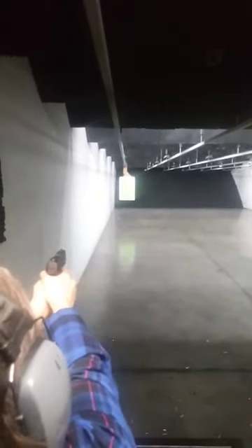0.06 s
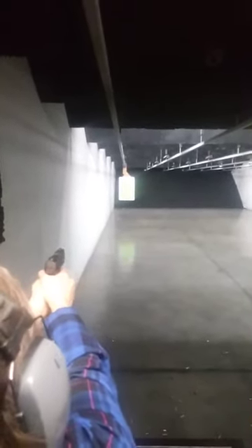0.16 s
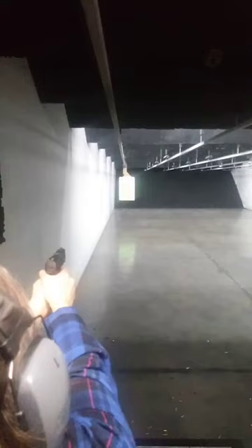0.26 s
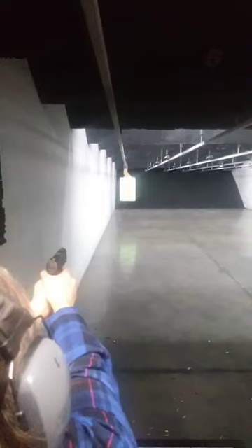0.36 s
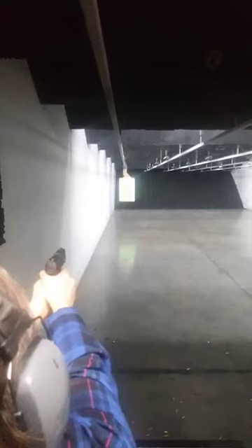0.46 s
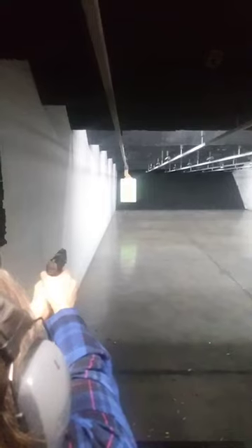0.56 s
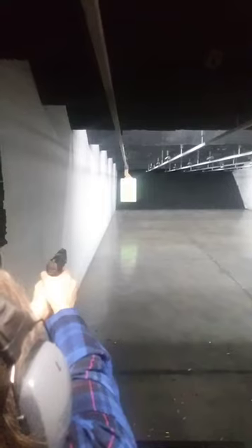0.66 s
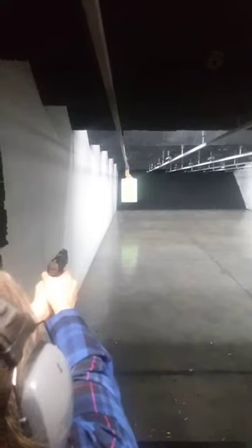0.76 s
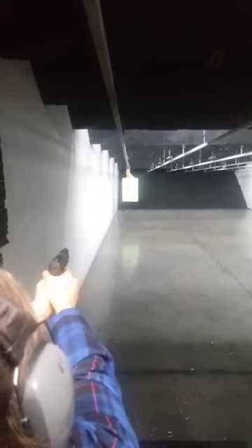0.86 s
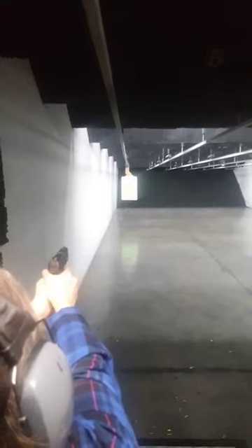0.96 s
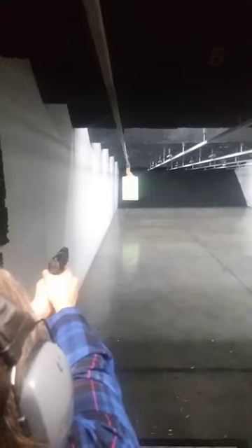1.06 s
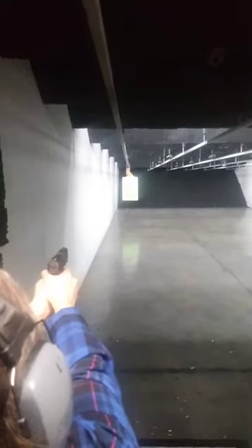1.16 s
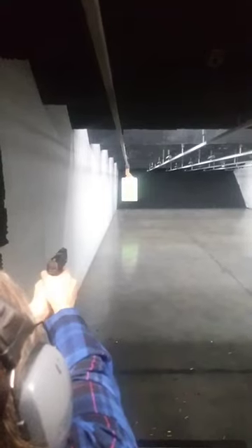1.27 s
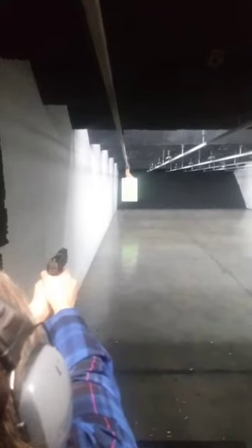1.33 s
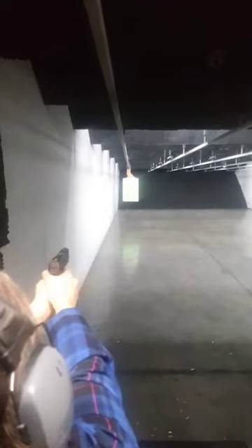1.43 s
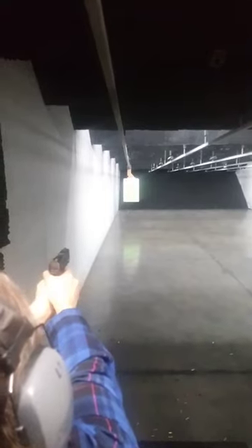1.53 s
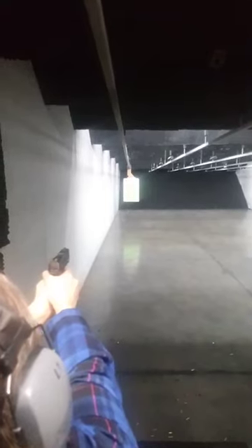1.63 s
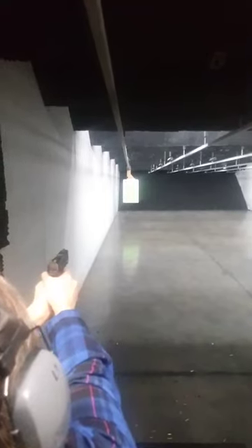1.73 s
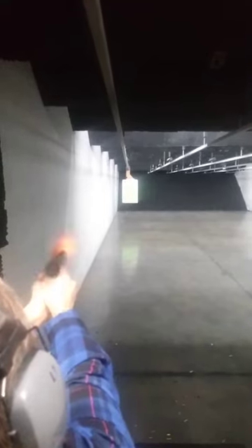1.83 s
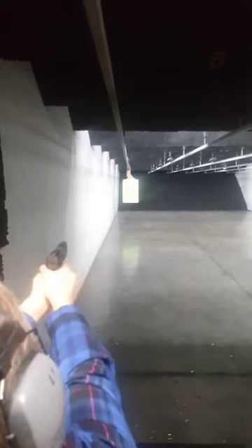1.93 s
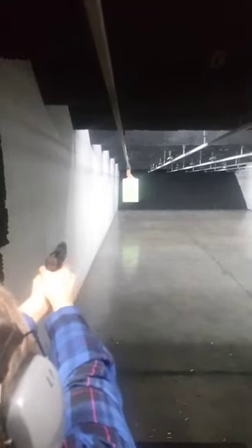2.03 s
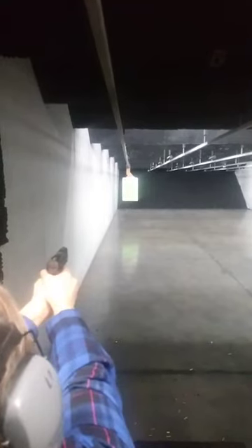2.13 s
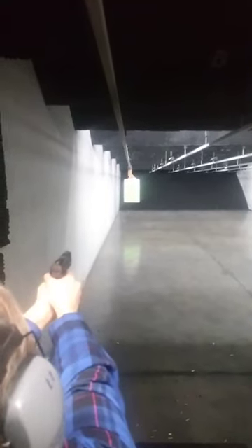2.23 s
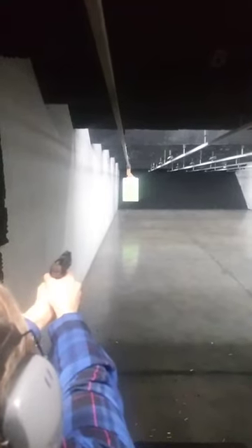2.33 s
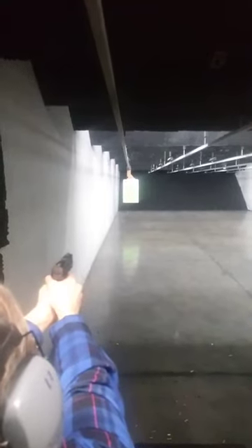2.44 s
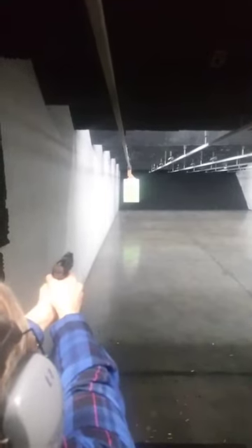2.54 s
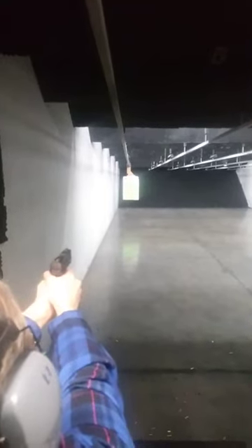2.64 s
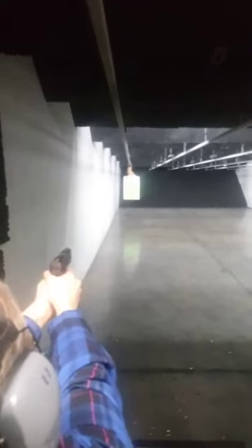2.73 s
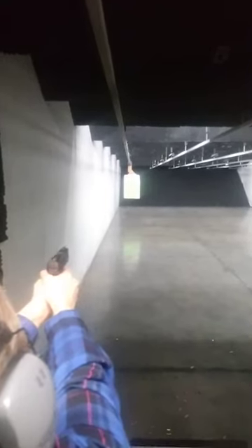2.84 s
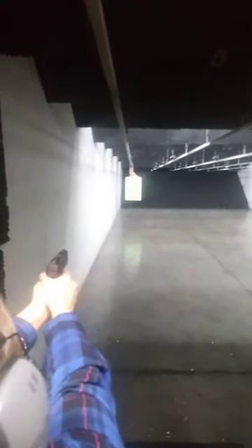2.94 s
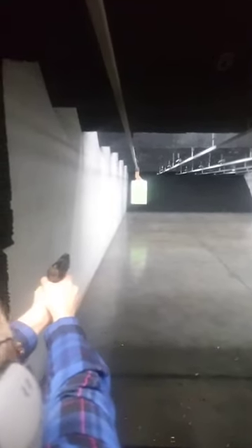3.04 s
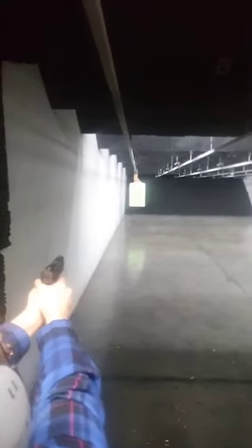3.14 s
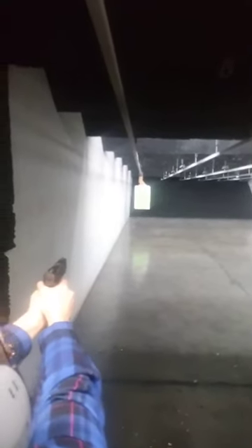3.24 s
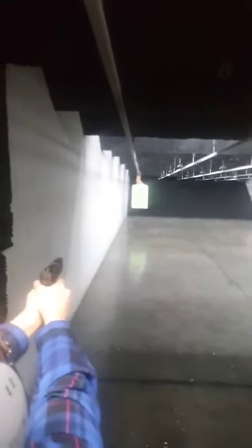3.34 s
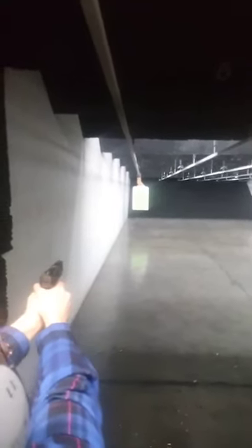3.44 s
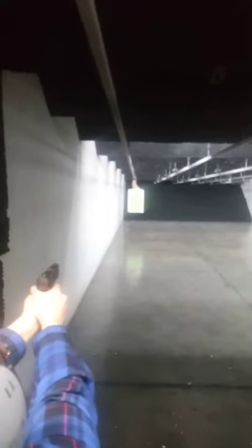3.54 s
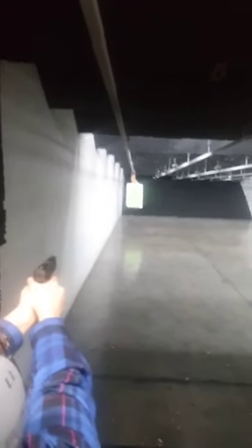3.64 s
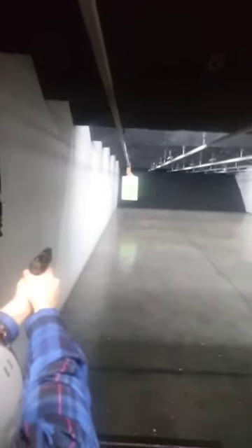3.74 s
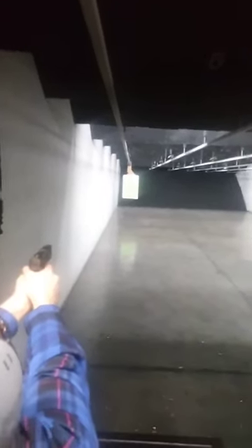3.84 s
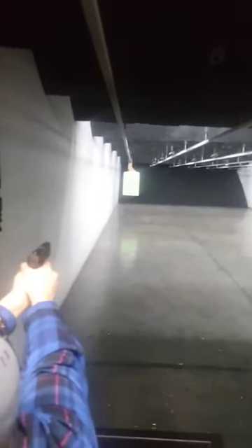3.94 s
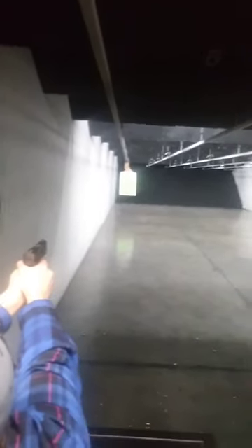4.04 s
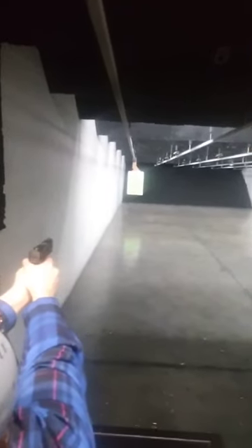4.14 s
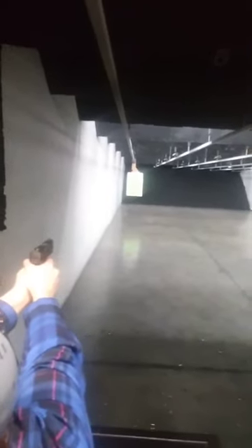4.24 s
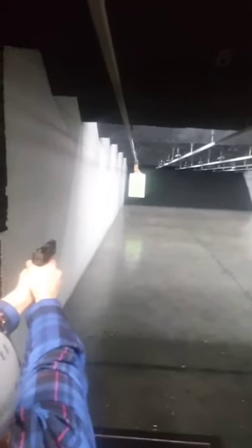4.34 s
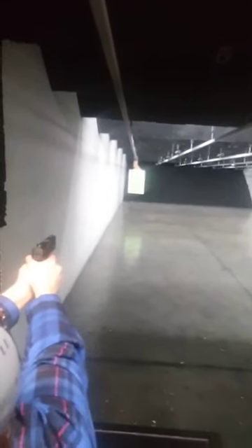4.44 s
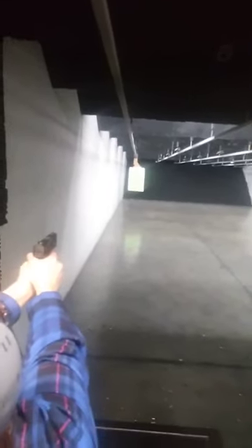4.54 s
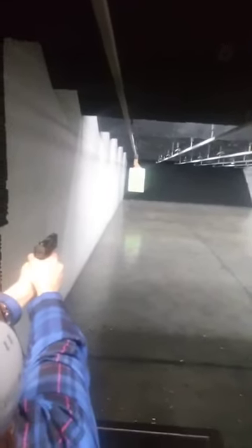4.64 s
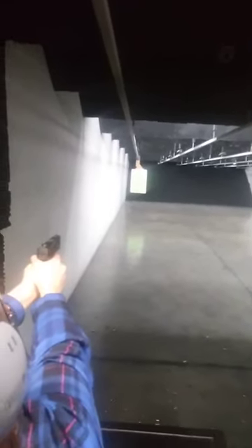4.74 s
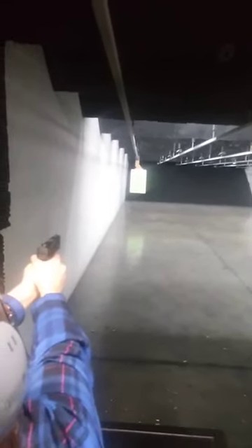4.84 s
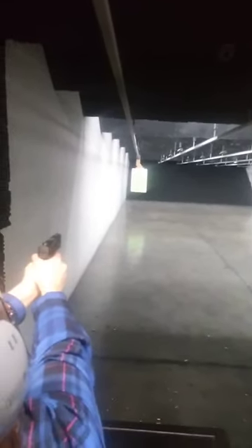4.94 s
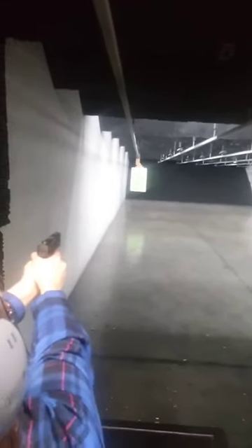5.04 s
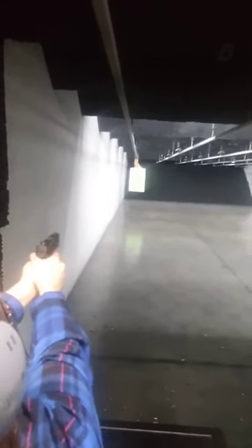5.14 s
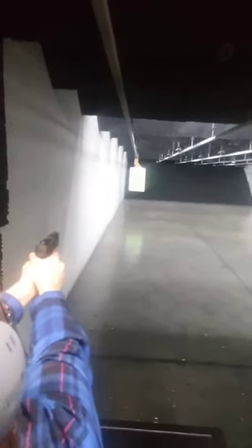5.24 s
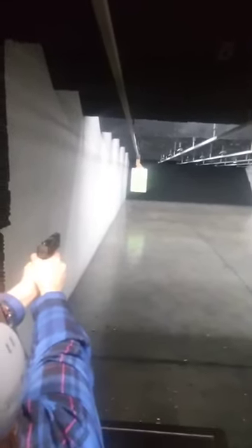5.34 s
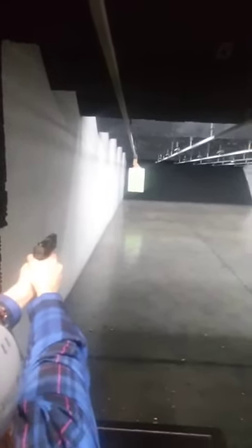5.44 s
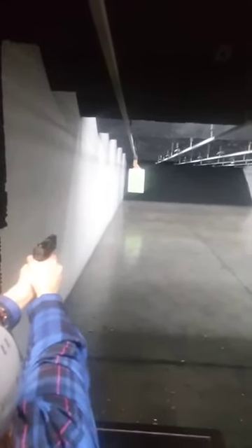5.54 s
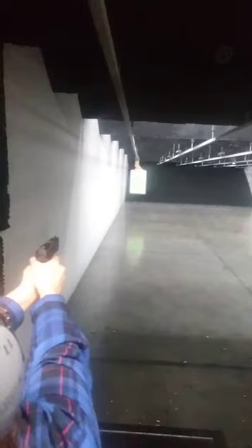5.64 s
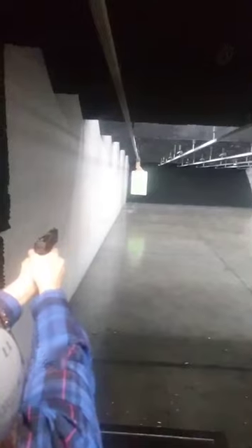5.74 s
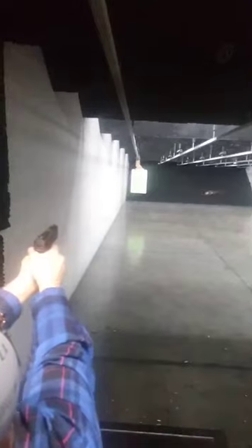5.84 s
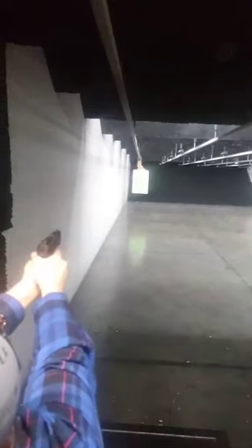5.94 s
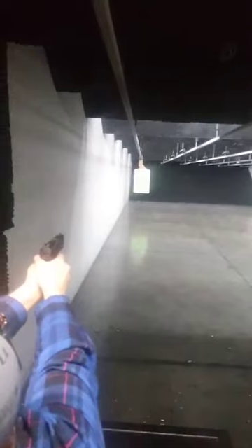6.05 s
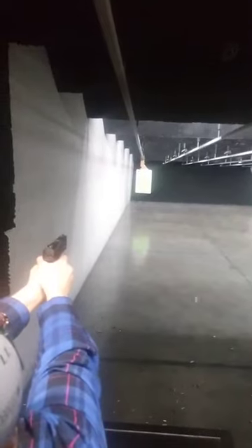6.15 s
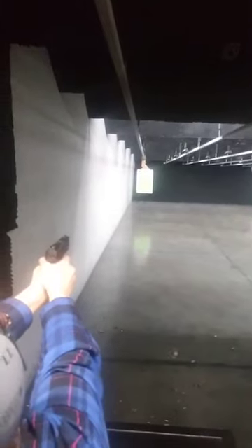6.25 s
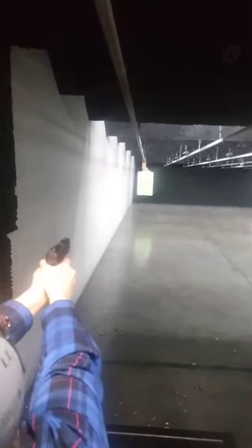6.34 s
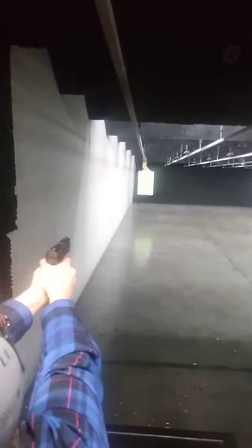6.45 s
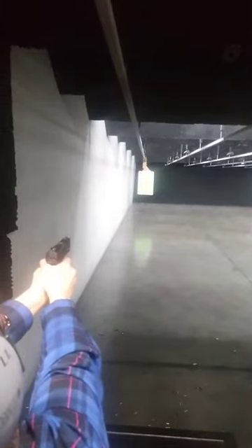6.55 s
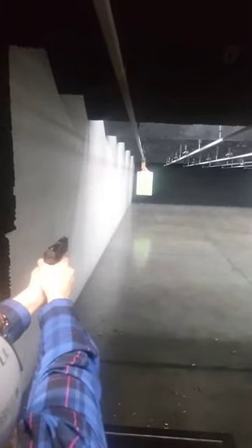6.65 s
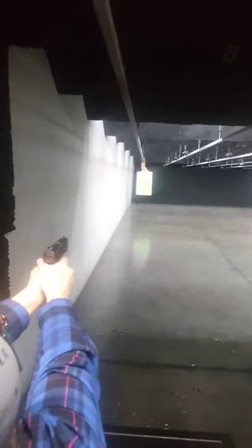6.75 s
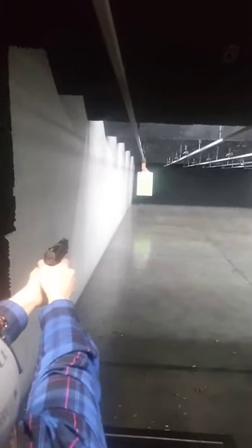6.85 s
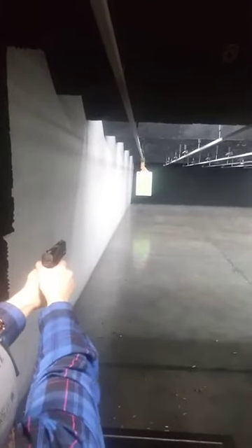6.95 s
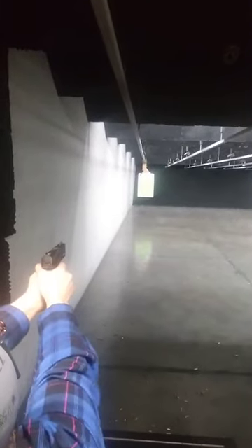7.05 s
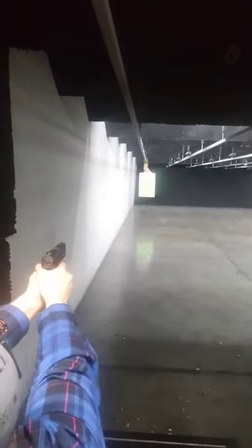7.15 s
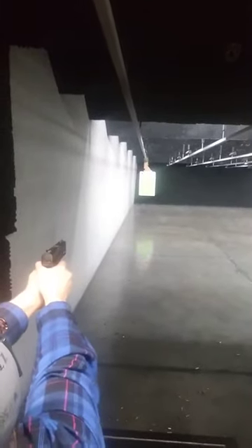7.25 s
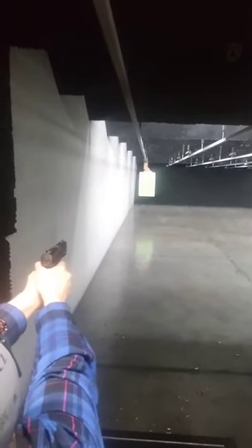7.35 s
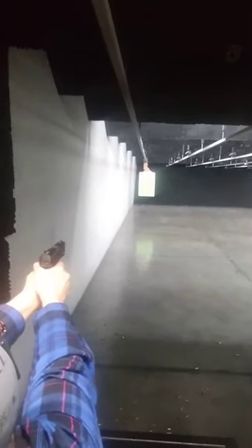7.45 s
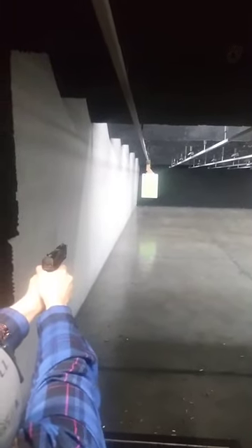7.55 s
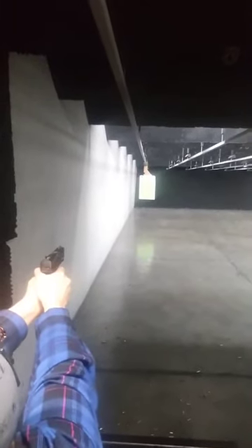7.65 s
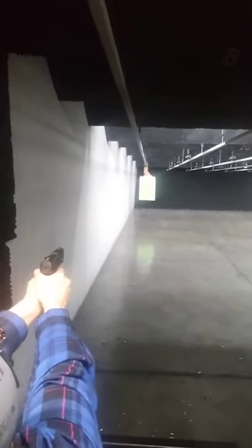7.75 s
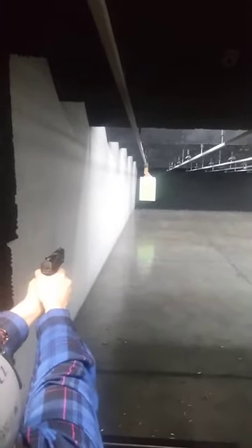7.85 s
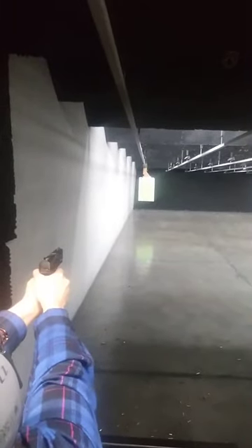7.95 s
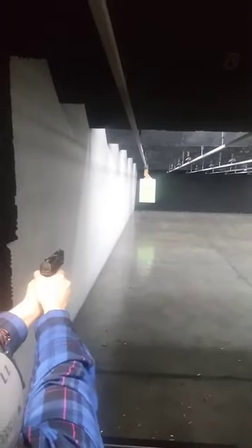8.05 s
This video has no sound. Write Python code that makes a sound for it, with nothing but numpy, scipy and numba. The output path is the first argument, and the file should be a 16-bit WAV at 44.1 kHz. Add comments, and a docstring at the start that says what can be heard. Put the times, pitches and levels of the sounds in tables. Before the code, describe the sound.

Close behind a shooter at an indoor range, steady airy hiss and faint whine are broken by two single gunshots. Each starts with a sharp bright crack, breaks into brief dry crackling and near-silence as the microphone overloads, then bursts back as a dense, midrange hall roar lasting over a second. High metallic casing tinks follow each shot, bouncing on concrete with quick faint slap-back. Small mechanical clicks come just before the shots.

```python
"""A hard concrete shooting lane: two handgun shots, heard by a one-port microphone just behind the shooter.
Each shot is band noise for the crack and band-wise decaying noise for the roar of the hall.
A timed sensitivity curve cuts the overloaded capsule off; pulses make it crackle, and a limiter flattens the roar.
Spent brass cases tick, ring and clank as decaying noise and tone, and small clicks are noise bursts.
Shaped noise gives the ventilation hiss throughout, steady tones and a noise band the motor whine."""
import sys
import numpy as np
from scipy import signal
from scipy.fft import rfft, irfft
from scipy.io import wavfile
from scipy.ndimage import uniform_filter1d, minimum_filter1d
from numba import njit

SR = 44100
rng = np.random.default_rng(int(sys.argv[2]) if len(sys.argv) > 2 else 0)


def nominal_scale(level):
    """Amplitude ratio for a level in decibels (scalar or array-like)."""
    x = np.asarray(level, float) / 20
    return 10 ** x


def master(y):
    """Save y as 16-bit WAV."""
    cut = np.clip(np.atleast_2d(y).T, -1, 1)
    pcm = np.round(cut * 32767)  # scale
    wavfile.write(sys.argv[1], SR, pcm.astype(np.int16))


N = 356769
T = np.arange(N) / SR  # time axis [s]

# Ventilation spectrum: (frequency [Hz], relative level [dB per Hz])
AIR_SPECTRUM = [(60, -47), (110, -24.5), (184, -4.5), (237, -4.5), (393, -3), (640, -3), (1100, -5),
                (2000, -12), (3400, -16), (4040, -13.5), (4940, -17.5), (6370, -22.5), (9580, -34),
                (15500, -38)]
# Motor drive, a comb of steady tones split by the mains: (frequency [Hz], rms level [dB])
WHINE_TONES = [(3771, -75), (3849, -72), (3909, -69), (3969, -67), (4008, -70), (4029, -67), (4089, -62),
               (4149, -70), (4188, -72), (4287, -75), (4407, -72), (14000, -85)]
# Small mechanical clicks near the hands: (time [s], level before decay [dB], centre [Hz], t60 [s])
HAND_CLICKS = [(.555, -32.5, 9400, 0.0084), (1.838, -61, 6500, 0.024), (1.844, -34.5, 3820, 0.042),
               (5.686, -56, 6100, 0.033), (5.695, -37.5, 3680, 0.046)]
# Brass case on concrete: (time [s], ring level [dB], tick level [dB], tick centre [Hz])
CASE_BOUNCES = [(2.787, -29.5, -15, 6370), (3.3472, -34, -32, 6500), (3.351, -35, -35.5, 6030),
                (3.705, -41, -31.5, 5900), (3.9108, -43, -29.5, 5900), (4.0048, -53.5, -36, 5900),
                (4.1106, -54, -44, 4670), (4.184, -53, -49, 4470), (4.2285, -53, -55, 4300),
                (4.2482, -54, -55, 4460), (6.5218, -32, -19.5, 5800), (6.5269, -28, -16.5, 5860),
                (6.8955, -31, -20.5, 6000), (7.2787, -37.5, -33.5, 4900), (7.2950, -43, -49, 4890),
                (7.4490, -36, -41, 5200), (7.669, -44.5, -28, 5950), (7.8363, -60, -31, 6200),
                (7.9595, -48, -58, 6010), (7.9987, -41, -54, 4730)]
# Ring of the case from each shot: (frequency [Hz])
CASE_RING_HZ = [12540, 12750]
# Shots: (time [s], hall level [dB], crack level [dB]), both before their envelopes
SHOT_LEVELS = [(1.8947, 15, -6), (5.7402, 15, 5)]
# Colour of the roar at the start: (frequency [Hz], relative level [dB per Hz])
ROAR_SPECTRUM = [(60, -78), (120, -29.5), (200, -18), (280, -15.5), (400, -9.5), (560, -2), (800, -0.5),
                 (1100, -1.5), (1600, -8.5), (2100, -13.5), (2750, -10.5), (3400, -16), (4500, -12),
                 (6400, -16), (9000, -25.5), (11000, -24.5), (14500, -16.5), (16500, -39)]
# Reverberation time of the hall: (frequency [Hz], t60 [s])
ROAR_T60 = [(100, 1.3), (400, 1.55), (3000, 1.55), (4500, 1.4), (6400, 1.2), (9000, .98), (11000, .72),
            (14500, .46)]
# Slow resonances that outlast the roar: (frequency [Hz], width [Hz], level re roar [dB], t60 [s])
SLOW_RESONANCES = [(604.5, 125, -28, 3.38), (819, 109, -22.5, 2.8), (1046, 123, -25.5, 2.92),
                   (1317, 890, -26.5, 2.69)]
# Stunned capsule: (chatter ends [s], faint thud [s], sound leaks back [s], snaps to other rail [s], slides free [s])
STUNNED_CAPSULE = [(1.9136, 1.9425, 1.9835, 2.0324, 2.082), (5.7547, 5.7815, 5.8275, 5.8833, 5.927)]
# Downward spikes, troughs of the roar that break through the rail: (time [s], peak before high-pass [dB])
RAIL_TROUGHS = [(2.0487, -12), (2.0528, -5), (2.0622, -18), (2.0653, -5), (2.0716, -6), (2.0766, -5),
                (2.0784, -12), (2.0826, -5), (2.0856, -4), (5.9110, -8), (5.9118, -7), (5.9138, -13),
                (5.9159, -6), (5.9171, -4), (5.9190, -13), (5.9240, -22), (5.9287, -4), (5.9325, -4),
                (5.9340, -4), (5.9362, -5)]
# Microphone housing modes: (frequency [Hz], level re exciting pulse [dB], t60 [s])
HOUSING_MODES = [(504, -50, 0.009), (990, -47, 0.02), (2450, -47, 0.011)]

# Sensitivity, times after the shot [s]: still open, sagging, cut off, deaf
OPEN_S, SAG_S, SAG_DB, CUT_S, CUT_DB = 0.0054, 0.0079, -15, 0.00865, -74
DEAF_S, DEAF_DB, SWITCH_S = .03, -106, .0012
# A faint leak; the swell starts SWELL_S before the snap and reaches SWELL_DB at SNAP_S before it
LEAK_DB, SWELL_S, SWELL_DB, SNAP_S, SNAP_DB = -60, 0.026, -33.5, 0.0036, -13
# Sensitivity as the capsule comes free, and the times after that [s]
FREE_DB, SLIDE_S, SLID_DB, SETTLE_S = -16.5, 0.036, -12.5, .12
# Pulses: time after the shot [s], size before the high-pass [dB], nominal width [ms]
JOLT_S, JOLT_DB, JOLT_MS = .007, -2, 0.14
THUD_DB, THUD_MS, SNAP_STEP_DB, SNAP_MS = -36.5, 0.45, -6.5, 0.71
# Chatter: spacing [s], jitter [share of spacing], size and its spread [dB]
CHATTER_S, CHATTER_JITTER, CHATTER_DB, CHATTER_SPREAD_DB = 0.0017, .12, -3.5, 1
TWIN_SHARE, TWIN_S = .5, .0003  # share of spikes with a twin, and its lead [s]


def level(x, db):
    """Root-mean-square normalisation: scale a signal to an rms level in dB."""
    return x * nominal_scale(db) / np.sqrt(np.mean(x ** 2))


def read(points, hz):
    """Interpolate a (frequency, value) table on a logarithmic frequency axis."""
    f, v = np.transpose(points)
    return np.interp(np.log(np.maximum(hz, 1)), np.log(f), v)


def band(size, hz, width):
    """Resonance: noise passed twice through a peak filter, brought to rms 1."""
    b, a = signal.iirpeak(hz, hz / width, fs=SR)
    once = signal.lfilter(b, a, rng.standard_normal(size))
    return level(signal.lfilter(b, a, once), 0)


def fade(t, t60):
    """Exponential decay: 60 dB of loss in t60 seconds."""
    return np.exp(-np.log(1000) * t / t60)


def add(out, s, x):
    """Superposition: mix x into out from s seconds on."""
    i = int(s * SR)
    out[i:i + len(x)] += x[:N - i]


def ventilation():
    """Turbulent flow: broadband noise of a given spectrum, its level wavering slowly."""
    hz = np.fft.rfftfreq(N, 1 / SR)
    spectrum = rfft(rng.standard_normal(N)) * nominal_scale(read(AIR_SPECTRUM, hz))
    air = level(irfft(spectrum, N), -47)
    smooth = uniform_filter1d(rng.standard_normal(N), size=6000)
    waver = level(uniform_filter1d(smooth, size=6000), 0)
    return air * nominal_scale(0.65 * waver)  # 0.65 dB rms of waver


def motor_whine():
    """Periodic excitation: a line spectrum of steady tones, with a noise band around most of them."""
    tones = 0
    for hz, db in WHINE_TONES:
        tones = tones + nominal_scale(db) * np.sqrt(2) * np.sin(2 * np.pi * (hz * T + rng.random()))
    return tones + nominal_scale(-68.5) * band(N, 4120, 550)


def clicks():
    """Impulsive contact: short, dry bursts of decaying band noise."""
    out, t = np.zeros(N), T[:SR // 5]
    for s, db, hz, t60 in HAND_CLICKS:
        add(out, s, nominal_scale(db) * band(len(t), hz, 0.91 * hz) * fade(t, t60))
    return out


def cases():
    """Impact and modal decay: a tick with a wall echo, a high wavering tube ring and a lower body clank."""
    out, t = np.zeros(N), T[:SR]
    for s, ring_db, tick_db, tick_hz in CASE_BOUNCES:
        hz = CASE_RING_HZ[sum(s > row[0] for row in SHOT_LEVELS) - 1]  # case of the latest shot
        # a tone plus narrow noise wavers as the case tumbles
        tumbling = 0.51 * np.sin(2 * np.pi * (hz * t + rng.random())) + 0.82 * band(len(t), hz, 150)
        ring = nominal_scale(ring_db) * tumbling * (fade(t, 0.19) + nominal_scale(-8.0) * fade(t, 0.42))
        clank = nominal_scale(tick_db - 23.5) * band(len(t), 5870, 740) * fade(t, 0.98)
        shape = np.clip(t / 0.0012, 0, 1) * (fade(t, 0.027) + nominal_scale(-12.5) * fade(t, 0.13))
        body = nominal_scale(0.5) * band(len(t), tick_hz, 1700)
        treble = nominal_scale(-11) * band(len(t), 11000, 9000)
        tick = shape * nominal_scale(tick_db) * (body + treble)
        add(out, s - .001, ring + clank + tick)
        add(out, s + .073, nominal_scale(-20) * tick)  # slap-back from a far wall
    return out


def hall_roar(t):
    """Reverberation: each quarter-octave band of noise decays at its own rate, the highest fastest."""
    hz = np.fft.rfftfreq(len(t), 1 / SR)
    noise = rfft(rng.standard_normal(len(t))) * nominal_scale(read(ROAR_SPECTRUM, hz))
    noise = noise / np.std(irfft(noise))
    octave = np.log2(np.maximum(hz, 1))
    roar = 0
    for centre in np.arange(5.5, 14.25, .25):
        part = irfft(noise * np.clip(1 - 4 * np.abs(octave - centre), 0, 1))
        roar = roar + part * fade(t, read(ROAR_T60, 2 ** centre))
    return roar


def shot(hall_db, crack_db):
    """Direct and reverberant sound: a bright crack, then the roar and slow resonances of the hall."""
    t = T[:4 * SR]
    roar = hall_roar(t)
    drone = sum(nominal_scale(db) * band(len(t), f, w) * fade(t, t60) for f, w, db, t60 in SLOW_RESONANCES)
    arrival = np.clip((t - .0035) / 0.0038, 0, 1)
    rise = np.clip(t / .0025, 0, 1) ** 2
    crack = (band(len(t), 4730, 1690) + 1.23 * band(len(t), 8400, 6000)) * rise * fade(t, 0.15)
    return nominal_scale(hall_db) * arrival * (roar + drone) + nominal_scale(crack_db) * crack


def scene():
    """Superposition of all pressures at the single microphone port, on two equal channels."""
    out = ventilation() + motor_whine() + clicks() + cases()
    for s, hall_db, crack_db in SHOT_LEVELS:
        add(out, s, shot(hall_db, crack_db))
    return np.array([out, out])


def sensitivity():
    """Overload and recovery: a dB curve of cut-off, swelling leak, snap, deafness and sliding free."""
    db = np.zeros(N)
    for (s, _, _), (_, _, leak, snap, free) in zip(SHOT_LEVELS, STUNNED_CAPSULE):
        stages = [
            (s + OPEN_S, 0), (s + SAG_S, SAG_DB), (s + CUT_S, CUT_DB), (s + DEAF_S, DEAF_DB),
            (leak - SWITCH_S, DEAF_DB), (leak, LEAK_DB), (snap - SWELL_S, LEAK_DB),
            (snap - SNAP_S, SWELL_DB), (snap, SNAP_DB), (snap + SWITCH_S, DEAF_DB),
            (free - SWITCH_S, DEAF_DB), (free, FREE_DB), (free + SLIDE_S, SLID_DB), (free + SETTLE_S, 0)]
        db = db + np.interp(T, *np.transpose(stages))
    return db


def unstick(x):
    """One-sided clipping: all above a rising rail is flattened, and a high-pass recentres the rest."""
    b, a = signal.butter(2, 520, "high", fs=SR)
    for *_, free in STUNNED_CAPSULE:
        progress = (T - free) / SLIDE_S
        stuck = (progress > 0) & (progress < 1)
        rail = -.6 + 1.7 * progress
        clipped = np.minimum(x, rail) - np.minimum(rail, 0)
        troughs = signal.lfilter(b, a, stuck * clipped)
        x = np.where(stuck, 1.9 * (1 - progress ** 2) * troughs + progress ** 2 * x, x)
    return x


def spike(s, size):
    """Amplitude-dependent width: a (time [s], signed size, width [ms]) row, wider the larger it is."""
    return s, size, 0.018 + 0.087 * abs(size)


def steps():
    """Capsule displacement as pulses, rows of (time [s], signed size, nominal width [ms])."""
    rows = [spike(s, -nominal_scale(db)) for s, db in RAIL_TROUGHS]
    for (s, _, _), (quiet, thud, leak, snap, _) in zip(SHOT_LEVELS, STUNNED_CAPSULE):
        rows.append((s + JOLT_S, nominal_scale(JOLT_DB), JOLT_MS))
        rows += [(thud, nominal_scale(THUD_DB), THUD_MS), (leak, nominal_scale(THUD_DB), THUD_MS)]
        rows.append((snap, nominal_scale(SNAP_STEP_DB), SNAP_MS))
        # upward chatter, laid out backwards from its end
        when, luck = np.arange(quiet, s + CUT_S, -CHATTER_S), rng.standard_normal((16, 3))
        for at, (late, size, twin_size), twin in zip(when, luck, rng.random(16)):
            at = at + CHATTER_JITTER * CHATTER_S * late
            rows.append(spike(at, nominal_scale(CHATTER_DB + CHATTER_SPREAD_DB * size)))
            if twin < TWIN_SHARE:
                rows.append(spike(at - TWIN_S, nominal_scale(CHATTER_DB - CHATTER_SPREAD_DB * abs(twin_size))))
    return rows


def crackles():
    """Transient response: the input high-pass swings each pulse back and the housing rings faintly."""
    pulses = np.zeros(N)
    for s, size, ms in steps():
        width = max(ms, .03) * SR / 1000  # samples
        reach = 3 * int(width) + 3
        k = np.arange(-reach, reach + 1)
        pulses[int(s * SR) + k] += size * np.exp(-((k - s * SR % 1) / (.75 * width)) ** 4)
    t = T[:SR // 20]
    housing = sum(nominal_scale(db) * np.sin(2 * np.pi * hz * t) * fade(t, t60) for hz, db, t60 in HOUSING_MODES)
    ringing = signal.fftconvolve(pulses, housing)[:N]
    b, a = signal.butter(4, 430, "high", fs=SR)
    return signal.lfilter(b, a, pulses + ringing)


@njit
def peak(x, release):
    """Peak detection: an envelope that jumps to each peak and then sinks exponentially."""
    y, e = np.empty(len(x)), 1e-6
    for i in range(len(x)):
        e = max(abs(x[i]), e * (1 - release))
        y[i] = e
    return y


def limit(x, top, release_s):
    """Look-ahead gain reduction: the gain dips smoothly just before each peak above top."""
    gain = np.minimum(1, top / peak(x, 1 / (release_s * SR)))
    return x * uniform_filter1d(minimum_filter1d(gain, size=15), size=15)


def low_pass(x):
    """Removes everything above the highest recorded frequency."""
    return signal.sosfilt(signal.butter(12, 17160, fs=SR, output="sos"), x)


def record(dry):
    """Transduction: the capsule cuts out and crackles, limiters flatten the roar, a low-pass cuts the top."""
    heard = unstick(dry[0] * nominal_scale(sensitivity()))
    flattened = limit(heard, .68, 0.014)
    x = limit(flattened + crackles(), .78, 0.00089)
    x = signal.sosfilt(signal.ellip(8, .2, 70, 17000, fs=SR, output="sos"), x)
    return low_pass(np.array([x, x]))


dry = scene()
out = record(dry)
master(out)
```